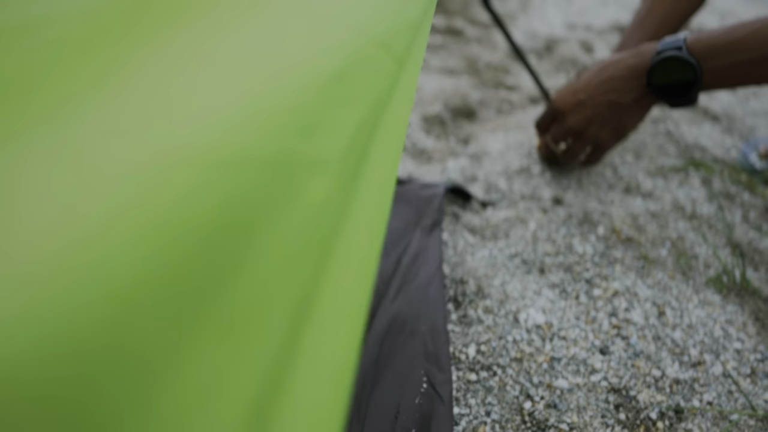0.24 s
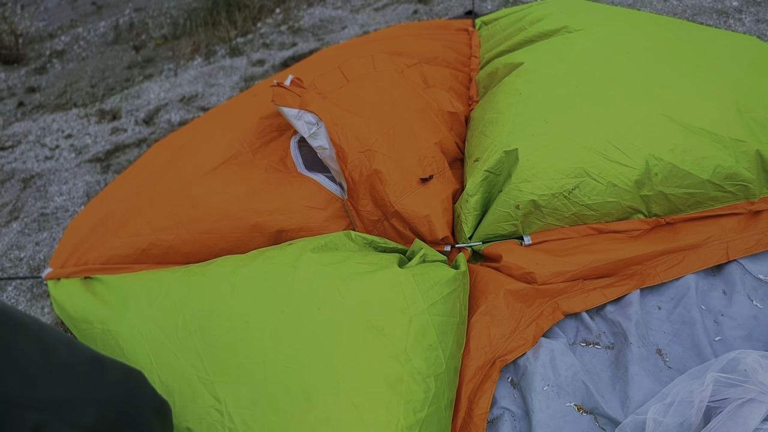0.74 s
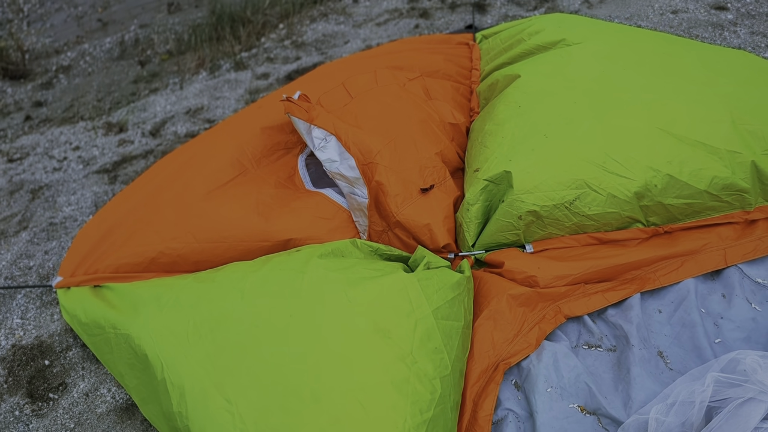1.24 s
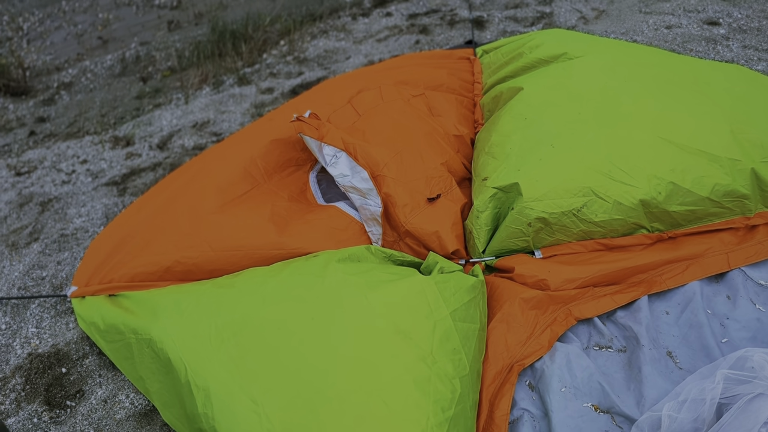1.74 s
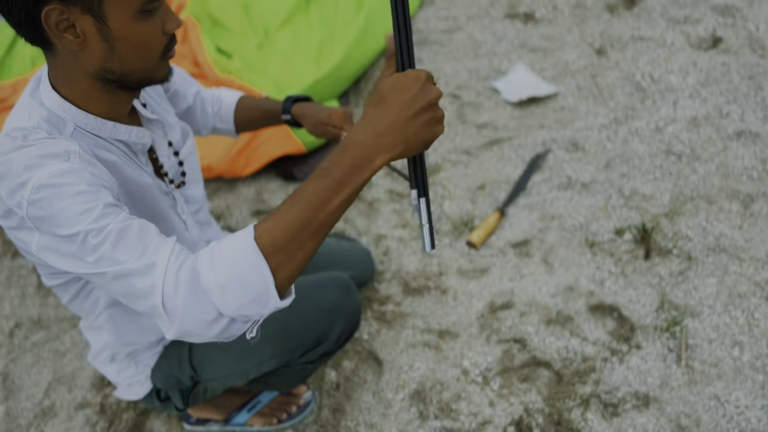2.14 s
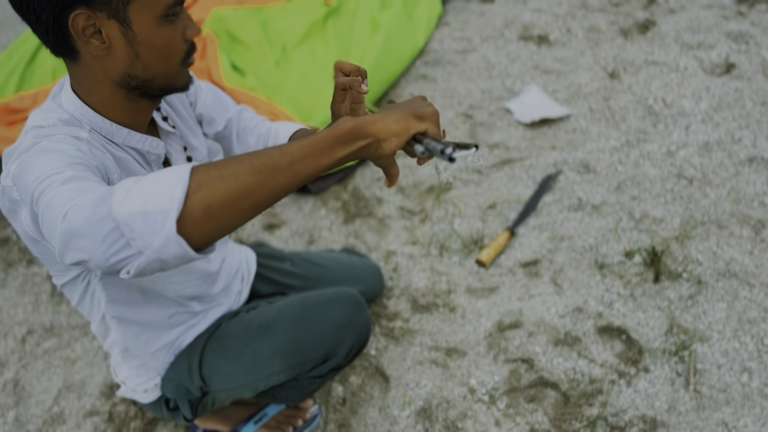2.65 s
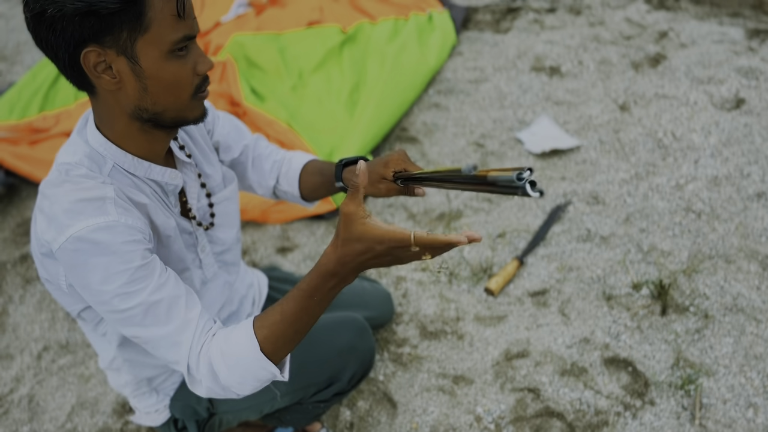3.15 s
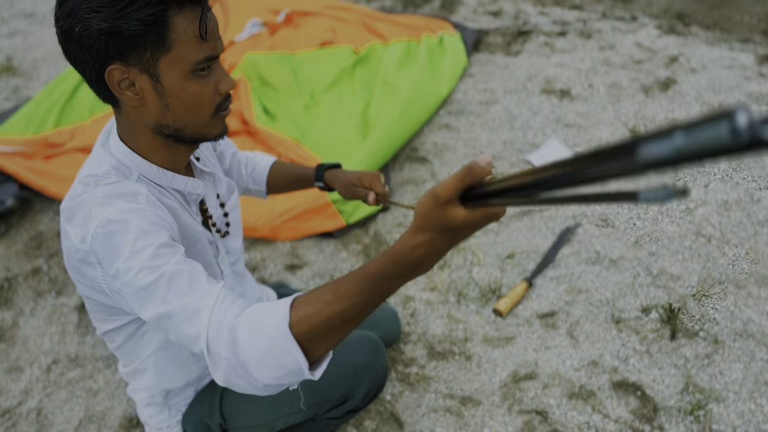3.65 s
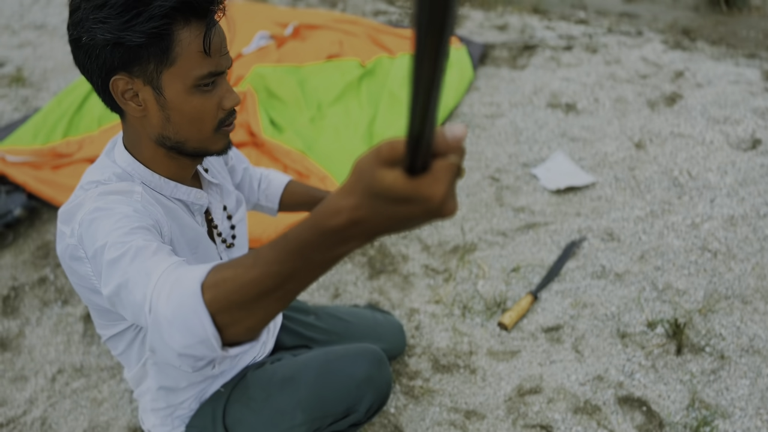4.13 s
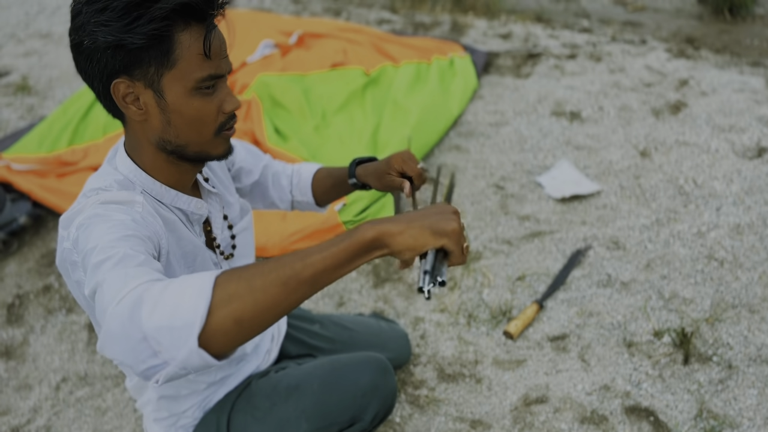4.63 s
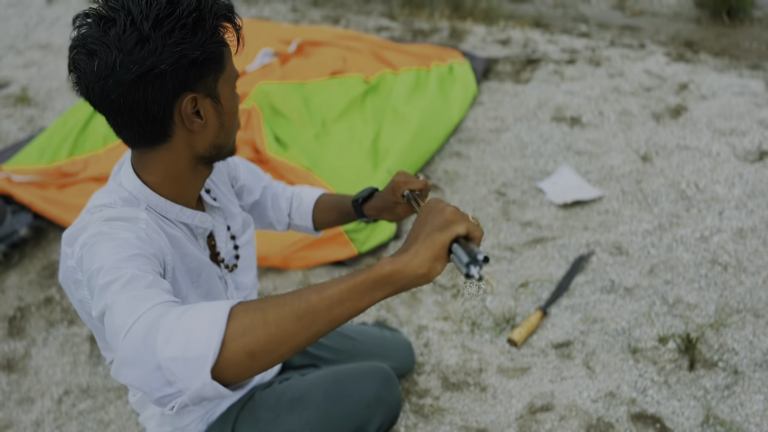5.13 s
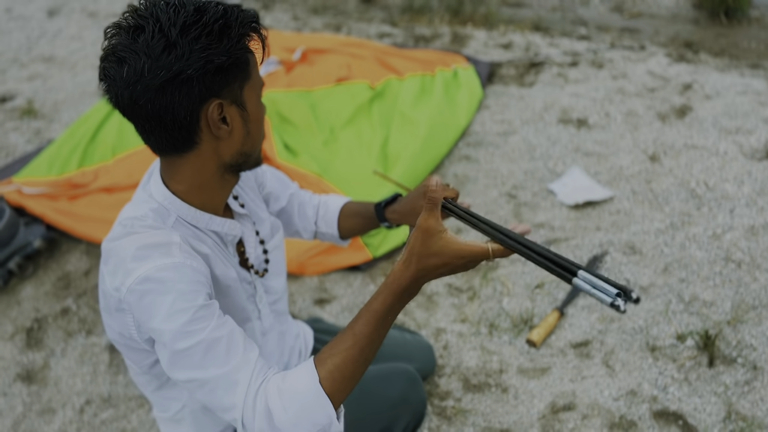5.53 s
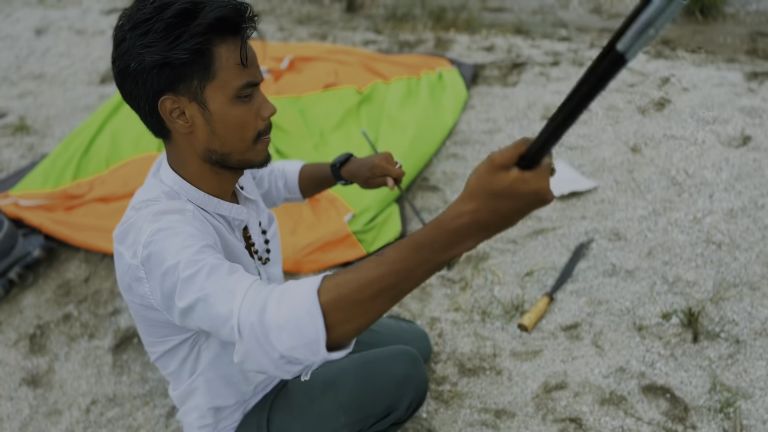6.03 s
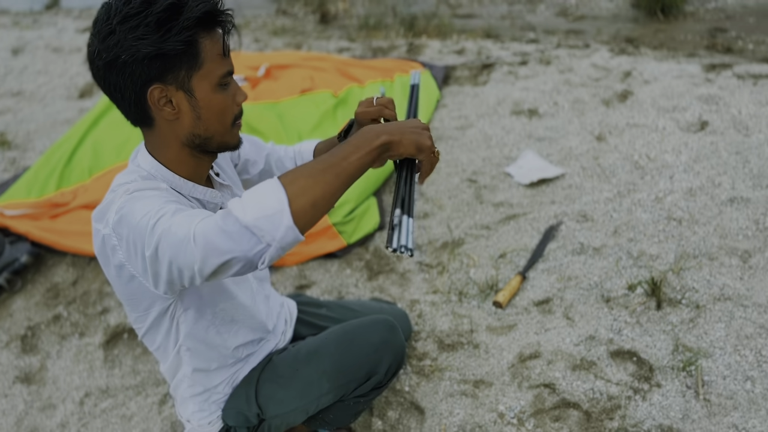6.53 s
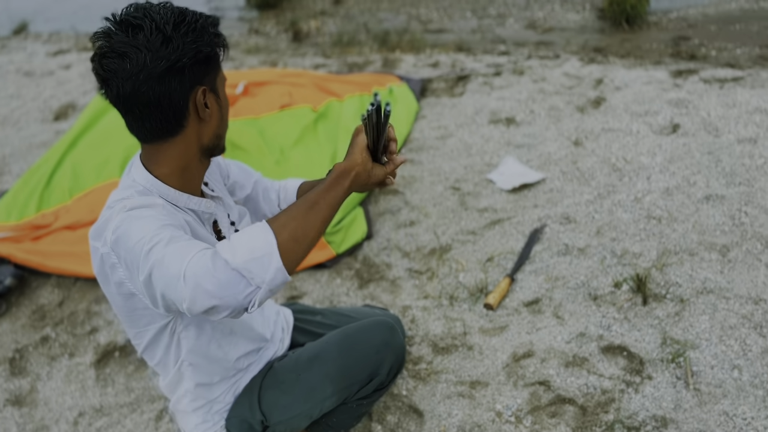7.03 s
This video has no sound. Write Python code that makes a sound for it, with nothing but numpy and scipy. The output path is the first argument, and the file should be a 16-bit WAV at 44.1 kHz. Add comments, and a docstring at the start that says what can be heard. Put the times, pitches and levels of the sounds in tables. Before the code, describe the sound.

Very close tent fabric swishes and buffets the microphone, its deep flaps louder than the following scene. Next comes soft, crinkly nylon rustling farther away, leaning left, with two short rubbed zips. After another cut, hard slender pole sections knock and scrape gently in the hands, ringing briefly, with small squeaks between. Open sandy riverbank, no room echo, steady faint water, fluttering breeze and a thin high shrill.

```python
"""A bundle of jointed tent poles is unfolded on a sandy riverbank: sections slide and knock together.
Each knock is a burst of tiny rebounds ringing the bending modes of a pole; the slides are gritty banded noise.
Before that, tent fabric (crease snaps on banded noise) swishes and buffets the microphone close by; a cut at .412 s
leads to far rustling in tugs, a cut near 2.14 s to the poles. Zip tones of rubbed nylon and hoarse squeaks are sines.
The river flickers throughout; the breeze joins after the close fabric, an insect-like shrill with the poles."""
import sys
import numpy as np
from scipy import signal
from scipy.fft import rfft, irfft
from scipy.io import wavfile
from scipy.ndimage import uniform_filter1d, minimum_filter1d

SR = 44100
rng = np.random.default_rng(int(sys.argv[2]) if len(sys.argv) > 2 else 0)


def put_to_file(sound):
    """Save the sound as 16-bit audio at rate SR, in the file named by the first command-line argument."""
    columns = np.atleast_2d(sound).T  # one column per channel
    safe = np.clip(columns, -1, 1)
    whole_steps = np.round(safe * 32767)
    wavfile.write(sys.argv[1], SR, whole_steps.astype(np.int16))


N = 321048
# A cut at .412 s to far fabric and breeze, which fade in; a cut near 2.14 s to the poles.
NEAR_ENDS_S, POLES_START_S = .412, 2.145


def from_db(db):
    """Gain from dB."""
    return np.exp(np.asarray(db) * (np.log(10) / 20))


def rms_one(x):
    """Scale to an rms of 1."""
    return x / np.sqrt(np.mean(x ** 2) + 1e-20)


def level(rows):
    """Gain at every sample, drawn in straight dB lines between rows of (s, dB)."""
    return from_db(np.interp(np.arange(N) / SR, *np.transpose(rows)))


def during(start, end):
    """One between two times in seconds, with 4 ms edges."""
    return np.interp(np.arange(N) / SR, [start - .004, start, end, end + .004], [0, 1, 1, 0])


def ease_in(fade_s):
    """Fade-in from silence for the far fabric and the breeze after the cut at .412 s."""
    return np.clip((np.arange(N) / SR - NEAR_ENDS_S) / fade_s, 0, 1) ** 2


def at_hz(points, hz):
    """Read a spectrum on a log-frequency axis."""
    return np.interp(np.log(hz), np.log(np.array(points)[:, 0]), np.array(points)[:, 1])


def cut(x, hz, kind, order=2):
    """Low-, high- or band-pass."""
    sos = signal.butter(order, np.clip(hz, 10, .45 * SR), kind, fs=SR, output="sos")
    return signal.sosfilt(sos, x)


def resonance(x, hz, width):
    """One resonance with gain 1 on top, width in Hz."""
    r = np.exp(-np.pi * width / SR)
    feed = np.array([1, 0, -1]) * (1 - r * r) / 2
    return signal.lfilter(feed, [1, -2 * r * np.cos(2 * np.pi * hz / SR), r * r], x)


def pan(db):
    """Channel gains for a left-minus-right level."""
    return from_db([[db / 2], [-db / 2]])


def leftward(x, db):
    """A source off to the left: only the shorter waves are shadowed."""
    return x + (pan(db) - 1) * cut(x, 1170, "high", order=1)


def delayed(x, seconds):
    """The same sound, later."""
    return np.interp(np.arange(len(x)) - seconds * SR, np.arange(len(x)), x, left=0)


def add(out, sound, seconds):
    """Mix a stereo sound in at a time."""
    start = max(int(seconds * SR), 0)
    out[:, start:start + sound.shape[1]] += sound[:, :max(N - start, 0)]


def drift(rate_hz):
    """Chance wandering with spread 1, smoothed above a rate and held for 16 samples at a time."""
    r = np.exp(-32 * np.pi * rate_hz / SR)
    warm_up = 4000
    steps = rng.standard_normal(N // 16 + warm_up + 1)
    slow = signal.lfilter([1], [1, -2 * r, r * r], steps)[warm_up:]
    return np.repeat(rms_one(slow), 16)[:N]


def swells(rows, rest_db, rise_share):
    """Gain of movements (s, length s, dB) that gather speed and die away, over a resting level."""
    t, rise = np.arange(N) / SR, np.clip(rise_share, .1, .9)
    power = from_db(rest_db) ** 2
    for s, length, db in rows:
        along = (t - s) / (length * np.where(t < s, rise, 1 - rise))
        power = power + from_db(db) ** 2 * np.exp(-np.minimum(along ** 2, 40))
    return np.sqrt(power)


def banded_noise(colour, patchy_db, flutter_rate_hz, count=16):
    """Stereo noise in narrow bands, each with its own level, flicker and likeness; rms 1."""
    # How alike left and right are. Each row: frequency in Hz, likeness (1 is the same, 0 is unrelated).
    likeness = [(50, 0.86), (250, 0.85), (600, 0.23), (1200, 0.07), (2400, 0.71), (5000, 0.14), (8000, 1)]
    edges = np.geomspace(colour[0][0], colour[-1][0], num=count + 1)
    mid, side = 0, 0
    together = drift(flutter_rate_hz)
    white = rng.standard_normal((2, 2, N))
    for k, (low, high) in enumerate(zip(edges, edges[1:])):
        band = cut(white[k % 2], [low, high], "band")   # neighbouring bands take different noise
        hz = np.sqrt(low * high)
        alike = np.clip(at_hz(likeness, hz), -1, 1)
        flicker_db = patchy_db * (together + drift(flutter_rate_hz))
        gain = from_db(at_hz(colour, hz) + flicker_db)
        mid = mid + np.sqrt(1 + alike) * gain * band[0]
        side = side + np.sqrt(1 - alike) * gain * band[1]
    return rms_one(np.array([mid + side, mid - side]))


def crinkle(per_s, size_db, decay_s):
    """Envelope of tiny creases and grains catching at random, over smooth friction; rms 1."""
    caught = rng.random(N) < per_s / SR
    snaps = caught * from_db(size_db * np.minimum(rng.exponential(1, N), 3))
    return rms_one(1 + signal.lfilter([1], [1, -np.exp(-1 / (decay_s * SR))], snaps))


def riverbank(river_db=3.0, breeze_db=-1, rumble_db=1, breeze_cut_hz=115):
    """Steady water, then a light breeze too; each puff flutters on the microphone, and some thud deeply."""
    # Murmur of the river, dipping at the cut to the poles.
    # Each row: time in seconds, level in dB before the river trim.
    river = [(0.5, -58), (0.55, -53), (2.1, -49.5), (2.17, -67), (2.19, -56.5), (2.87, -52), (4.26, -54.5),
             (6.31, -52.5), (6.46, -56), (7.25, -52)]
    # Colours of water, flutter and thuds. Each row: frequency in Hz, relative band level in dB.
    river_colour = [(150, -13), (220, -1), (350, 4), (650, 2), (900, 3), (1200, -4), (1600, -9.5),
                    (2500, -20), (6000, -48), (10000, -34), (15000, -39.5)]
    breeze_colour = [(110, -26), (140, 2.5), (200, 5.5), (280, -0.5), (420, -14.5), (900, -25.5)]
    rumble_colour = [(55, -11), (75, -12.5), (100, 1), (125, 11.5), (150, 8)]
    # Puffs of breeze. Each row: strongest moment in seconds, length in seconds,
    # flutter level in dB, deep thud level in dB, both before their trims.
    gusts = [(0.505, 0.19, -47.5, -45.5), (0.847, 0.22, -68, -53.5), (1.21, 0.08, -39, -45),
             (1.387, 0.044, -63, -54.5), (1.509, 0.11, -36.5, -93), (1.77, 0.031, -38, -90),
             (2, 0.45, -49, -90), (2.377, 0.18, -48, -54), (2.74, 0.084, -41, -47),
             (2.92, 0.31, -43.5, -80), (4.33, 0.77, -55.5, -59), (5.043, 0.087, -45, -47),
             (5.597, 0.36, -50.5, -61), (5.878, 0.045, -48.5, -68), (6.178, 0.11, -53, -62),
             (6.807, 0.1, -57, -60), (7.05, 0.093, -41.5, -44), (7.2, 0.027, -35.5, -71.5)]
    flutter = swells([(s, length, db) for s, length, db, _ in gusts], rest_db=-58.5, rise_share=0.56)
    thuds = swells([(s, length, db) for s, length, _, db in gusts], rest_db=-93.5, rise_share=0.52)
    water = banded_noise(river_colour, patchy_db=1.11, flutter_rate_hz=19) * level(river)
    breeze = banded_noise(breeze_colour, patchy_db=3.5, flutter_rate_hz=18, count=8) * flutter
    rumble = banded_noise(rumble_colour, patchy_db=1.5, flutter_rate_hz=10, count=6) * thuds
    gusting = ease_in(fade_s=0.068)
    upper = from_db(river_db) * water + from_db(breeze_db) * breeze * gusting
    return cut(upper, breeze_cut_hz, "high", order=6) + from_db(rumble_db) * rumble * gusting


def insect(hz=10350, width_hz=380, db=-77, waver_db=3):
    """A faint, thin shrill far off, like an insect in the grass: noise through a double resonance."""
    shrill = rng.standard_normal(N)
    for _ in range(2):
        shrill = resonance(shrill, hz, width_hz * 2)
    return rms_one(shrill) * from_db(db + waver_db * drift(5)) * during(POLES_START_S, N / SR)


def far_fabric(rustle_db=3.5, treble_hz=8000):
    """Nylon rubs on nylon farther off, tug by tug, its creases snapping, with its own treble per tug."""
    # Colour of the rustle. Each row: frequency in Hz, relative band level in dB.
    rustle_colour = [(500, 3), (1150, -6.5), (1850, 3), (2500, 0), (3800, 0.5), (5800, -6.5), (8000, -3.5),
                     (10000, -9), (13000, -11.5), (15500, -12)]
    # Tugs at the fabric. Each row: fastest moment in seconds, length in seconds,
    # level in dB before the rustle trim, extra treble in dB.
    tugs = [(0.68, 0.096, -45, -6), (0.805, .045, -47, 4.5), (0.855, 0.0056, -46.5, -3),
            (0.9, 0.042, -59.5, 9), (1.001, 0.019, -57.5, 16), (1.077, 0.057, -44.5, -1),
            (1.434, 0.26, -47.5, 2.5), (1.702, 0.057, -47.5, 5), (2.025, 0.12, -58.5, 2.5)]
    far = banded_noise(rustle_colour, patchy_db=0.32, flutter_rate_hz=22.0)
    far = far * crinkle(per_s=76, size_db=0.4, decay_s=0.00086)
    pull = swells([(s, length, db) for s, length, db, _ in tugs], rest_db=-59, rise_share=0.7)
    hiss_rows = [(s, length, db + treble_db) for s, length, db, treble_db in tugs]
    hiss = swells(hiss_rows, rest_db=-58, rise_share=0.7)
    far = far * pull + cut(far, treble_hz, "high", order=1) * (hiss - pull)
    shown = ease_in(fade_s=0.065) * during(NEAR_ENDS_S, POLES_START_S)
    return from_db(rustle_db) * leftward(far, db=5.5) * shown


def near_fabric(swish_db=2.5):
    """Nylon rubs on nylon close by and its creases snap, the treble swinging as the sheet speeds past."""
    # Fabric swept past the microphone. Each row: time in seconds, level in dB before the swish trim.
    swish = [(0, -50), (.128, -43.5), (.132, -30.5), (.21, -27), (.24, -33), (.32, -40), (.345, -44),
             (.41, -49)]
    # Colour of the swish. Each row: frequency in Hz, relative band level in dB.
    swish_colour = [(170, 9), (300, 15), (600, 8), (1200, 7), (2000, 3.5), (4800, 5), (6500, 0.5),
                    (8000, -0.5), (12000, -6.5), (15500, -7)]
    # How much treble is mixed in as the sheet passes. Each row: time in seconds, treble control in dB.
    swish_treble = [(.05, 5.5), (.14, -3), (.2, -19), (.27, 9), (.33, 8), (.4, -18)]
    near = banded_noise(swish_colour, patchy_db=1.6, flutter_rate_hz=16, count=12)
    near = near * crinkle(per_s=200, size_db=2.5, decay_s=0.00033)
    near = near + (level(swish_treble) - 0.5) * cut(near, 11000, "high", order=1)
    return from_db(swish_db) * leftward(near, db=10.5) * level(swish) * during(0, NEAR_ENDS_S)


def buffeting(port_lag_rad=0.73):
    """The moving sheet shoves air onto the microphone; flaps are a few swings crossing port to port."""
    # Colour of the shoved air. Each row: frequency in Hz, relative band level in dB.
    buffet_colour = [(22, -7), (45, -2.5), (95, -5), (170, -13.5), (350, -16.5), (900, -31), (2000, -57)]
    # Shoves of air. Each row: strongest moment in seconds, length in seconds, level in dB.
    shoves = [(.072, 0.0186, -12.5), (.135, .11, -19), (.39, 0.018, -25)]
    # The fabric pulls taut. Each row: centre in seconds, pitch in Hz, peak in dB, length in seconds.
    flaps = [(.0082, 64, -14.5, 0.01), (0.072, 212.5, -10.5, 0.0036), (0.075, 113.5, -8, 0.0052),
             (0.103, 55.6, -10, 0.0092), (0.2198, 706, -12.5, 0.0026), (.352, 574, -28.5, 0.0028),
             (0.362, 116, -20.5, 0.0061), (0.391, 68.6, -14, 0.0076)]
    t = np.arange(N) / SR
    ports = port_lag_rad * np.array([[-.5], [.5]])
    air = banded_noise(buffet_colour, patchy_db=3.5, flutter_rate_hz=8.7)
    air = air * swells(shoves, rest_db=-38.5, rise_share=0.39)
    for s, hz, db, length in flaps:
        swing = np.cos(2 * np.pi * hz * (t - s) + ports)
        air = air + from_db(db) * np.exp(-.5 * ((t - s) / length) ** 2) * swing
    return air * during(0, NEAR_ENDS_S) * pan(db=2.5)


def zips_and_squeaks(arch=0.12, waver=0.0686, rough_db=4):
    """Rubbed nylon zips, then squeaks: sines that rise and fall, with jittering pitch and level."""
    # Zip tones of rubbed nylon (0.67, 1.69 s), then short hoarse squeaks. Each row: middle in seconds,
    # length in seconds, top pitch in Hz, level in dB, hoarseness (0 is a steady pitch, about 1 is rough).
    tones = [(0.667, .14, 1864, -50.5, 1.17), (0.676, 0.1, 2680, -51.5, 0.96),
             (1.694, 0.1, 1836, -44.5, 0.66), (1.697, 0.088, 2780, -47.5, 0.78),
             (2.295, 0.086, 2020, -57, 0.3), (2.762, 0.074, 1890, -42, 0.36),
             (4.039, 0.026, 2100, -58, 0.7), (4.108, 0.052, 2130, -59.5, 1.2)]
    out = np.zeros((2, N))
    wobble, roughness = drift(180), drift(86)
    for s, length, hz, db, hoarse in tones:
        span = np.arange(int((s - length / 2) * SR), int((s + length / 2) * SR))
        along = np.linspace(-1, 1, len(span))
        pitch = hz * (1 - arch * along ** 2 + waver * hoarse * wobble[span])
        loudness = from_db(db + rough_db * roughness[span] / 2) * (1 - along ** 2)
        tone = loudness * np.sin(2 * np.pi * np.cumsum(pitch) / SR)
        add(out, tone * pan(db=2), s - length / 2)
    return out


ONSET_LEAD_S = .01   # room for the soft rise ahead of a knock's peak


def knock(bright_db, chatter_ms, grip, first_hit=4, crack_db=-4, tail_db=-31, tail_s=0.017,
          onset_db=-21, onset_s=.003, body_db=-20, mode_spread_db=3, apart_db=-8):
    """Sections meet and rebound, with a soft, short rise before the peak; scaled by the loudest 0.8 ms."""
    # Bending modes of a section. Each row: frequency in Hz, width in Hz, relative level in dB,
    # all as they are when the section rings free and before the random spread in level.
    modes = [(2370, 44, -20), (2813, 31, -1), (3736, 80, -1), (3980, 120, -2.5), (4650, 43, 1.5),
             (5654, 160, 4), (6700, 89, -19.5), (6600, 190, 4.5), (7340, 590, -5.5), (8160, 130, 4.5),
             (9160, 120, 2), (10260, 150, -2), (10800, 140, -1), (11860, 200, -3.5), (12570, 54, 1),
             (13600, 100, -3), (14500, 220, -10.5)]
    t = np.arange(SR // 8) / SR - ONSET_LEAD_S
    rebounds = np.exp(-abs(t) / (max(chatter_ms, .2) / 1000))
    rattle = from_db(tail_db) * np.exp(-abs(t) / tail_s)   # the other sections in the bundle are shaken too
    onset = from_db(onset_db) * np.exp(-abs(t) / onset_s)
    bounces = rng.standard_normal((2, len(t))) ** 3 / 4   # cubed: few strong, many weak
    force = bounces * np.where(t < 0, onset, rebounds + rattle)
    force[0, int(ONSET_LEAD_S * SR)] += first_hit / max(chatter_ms, 1)   # a clean hit, or a longer scrape
    sound = from_db(crack_db) * cut(cut(force, 2070, "high", order=3), 13000, "low")
    # the grip shifts and damps each mode differently at every touch
    chances = rng.standard_normal((len(modes), 2))
    for k, ((hz, width, db), (shift, strength)) in enumerate(zip(modes, chances)):
        ringing = resonance(force, hz * (1 + .07 * grip * shift), width * (1 + grip / 2))
        sound += (-1) ** k * from_db(db + mode_spread_db * grip * strength) * ringing
    sound += from_db(body_db) * cut(force, [250, 1800], "band")
    sound += (from_db(bright_db) - 1) * cut(sound, 7200, "high", order=1)
    mid, side = sound[0], from_db(apart_db) * sound[1]
    peak = np.sqrt(2 * uniform_filter1d(mid ** 2 + side ** 2, size=36).max())
    return np.array([mid + side, mid - side]) / peak


def pole_slides(slide_db=4.5):
    """Sections slide on each other and through the hands: gritty friction noise in swells."""
    # Colour of the sliding. Each row: frequency in Hz, relative band level in dB.
    slide_colour = [(900, -24), (2000, 1.5), (4000, 1), (6500, -2.5), (8400, -3.5), (10300, -6.5),
                    (13000, -5), (15500, -14.5)]
    # Slides. Each row: fastest moment in seconds, length in seconds, level in dB before the slide trim.
    slides = [(2.35, 0.24, -58), (2.57, 0.36, -63.5), (2.89, 0.24, -55.5), (3.48, 0.42, -64),
              (4.64, 0.44, -60.5), (4.91, 0.024, -53.5), (5.65, 0.073, -46), (6.1, 1, -64.5),
              (6.68, 0.11, -54.5), (6.98, 0.24, -61.5)]
    slide = banded_noise(slide_colour, patchy_db=3.5, flutter_rate_hz=13)
    slide = slide * crinkle(per_s=200, size_db=0.5, decay_s=0.0012)
    slide = slide * swells(slides, rest_db=-78, rise_share=0.61)
    return from_db(slide_db) * slide * during(POLES_START_S, N / SR)


def poles(knock_db=2.0, ground_db=-24, ground_s=0.011, held_db=-22):
    """Knocks with a dull reflection off the sand, over gritty sliding."""
    # Pole sections touching. Each row: time in seconds, level in dB before the knock trim,
    # brightness in dB, chatter decay in ms.
    knocks = [(2.260, -22.5, 4.5, 2.1), (2.425, -45, -18, 3), (2.487, -27.5, 9, 2), (2.512, -24, -1, 2.4),
              (2.539, -32, 7, 2.2), (2.550, -21, 17, 2.2), (2.57, -30, -12, 2), (2.5786, -23, 3.5, 3.2),
              (2.695, -19.5, 2.5, 4.5), (2.863, -38.5, -20, 0.81), (2.899, -26.5, 1, 4.9),
              (2.946, -24.5, 2, 6.4), (2.962, -20.5, 4, 9.6), (2.977, -30, -18, 4.6),
              (2.998, -32, -16, 3.7), (3.255, -35.5, 0, 3), (3.2836, -26.5, 10.5, 3.1),
              (3.2865, 0.5, 11, 1.66), (3.3168, -24.5, 9.5, 3.5), (3.381, -45, -18, 4),
              (3.955, -35, -7, 2.8), (3.972, -32, 0.5, 1.7), (4.443, -21, 3, 1.54), (4.456, -20.5, 14, 1.5),
              (4.557, -20.5, 2, 0.92), (4.575, -32, -18, 3.2), (4.588, -36, -23, 2.2),
              (4.738, -30.5, 11, 2.6), (4.751, -25.5, -1, 5.1), (4.763, -15.5, 17, 6.1),
              (4.77, -19.5, 11, 1.4), (4.935, -37.5, -8, 1.7), (5.012, -22, 5, 3), (5.033, -33, -20, 1.5),
              (5.055, -28.5, -1, 5.3), (5.066, -26.5, -11, 8.3), (5.152, -18, 8.5, 2.9),
              (5.299, -32.5, 0, 4.2), (5.352, -32, -24, 0.65), (5.541, -30.5, -18, 1.6),
              (5.589, -25.5, 3.5, 4.5), (5.633, -37, -8, 10), (5.66, -23.5, 1, 10), (5.6706, -20, -3, 4.5),
              (5.683, -16.5, 9, 5.8), (5.6887, -9.5, 7.5, 0.62), (5.691, -19.5, -7, 5.1),
              (5.828, -28.5, -10, 2.6), (5.943, -33, -7, 9.1), (6.3007, -23.5, -8, 1.5),
              (6.529, -35, -16, 1.7), (6.563, -29, 1, 5.1), (6.579, -29.5, 6, 5.7),
              (6.689, -33.5, -26, 2.7), (6.703, -40, -18, 5.4), (6.719, -40.5, -18, 2.6),
              (6.919, -35.5, 16.5, 3.7), (7.025, -35.5, -16, 10.5), (7.048, -32, -20.5, 1.6)]
    out = np.zeros((2, N))
    for s, db, bright_db, chatter_ms in knocks:
        grip = np.clip(db / held_db, 0, 1) ** 2   # light touches happen inside the fist, hard ones ring free
        add(out, from_db(db + knock_db) * knock(bright_db, chatter_ms, grip), s - ONSET_LEAD_S)
    dull = cut(out + 1e-18, 6000, "low")
    ground = np.array([delayed(side, ground_s) for side in dull])
    return (out + from_db(ground_db) * ground + pole_slides()) * pan(db=2.5)


def scene():
    """Poles, zips, squeaks and fabric over the river, the breeze and an insect."""
    background = riverbank() + insect()
    fabric = far_fabric() + near_fabric() + buffeting()
    return background + fabric + zips_and_squeaks() + poles()


def limiter(x):
    """The gain dips for a moment around any peak that would overload."""
    headroom = np.minimum(1, .93 / (np.abs(x).max(axis=0) + 1e-9))
    return x * uniform_filter1d(minimum_filter1d(headroom, size=21), size=21)


def record(dry, merge_hz=7000, late_above_hz=4700, late_s=.00014, cutoff_hz=15300):
    """Both sides share one treble signal, the left slightly late; peaks, rumble and top are cut."""
    hz = np.arange(N // 2 + 1) * SR / N
    left, right = rfft(dry)
    mid = (left + right) / 2
    side = (left - right) / 2 / (1 + (hz / merge_hz) ** 6)
    twist = np.exp(-2j * np.pi * np.maximum(hz - late_above_hz, 0) * late_s)
    both = limiter(irfft(np.array([(mid + side) * twist, mid - side]), N))
    top_cut = signal.ellip(8, .2, 90, cutoff_hz, fs=SR, output="sos")
    return signal.sosfilt(top_cut, cut(both, 30, "high"))


dry = scene()
out = record(dry)
put_to_file(out)
```